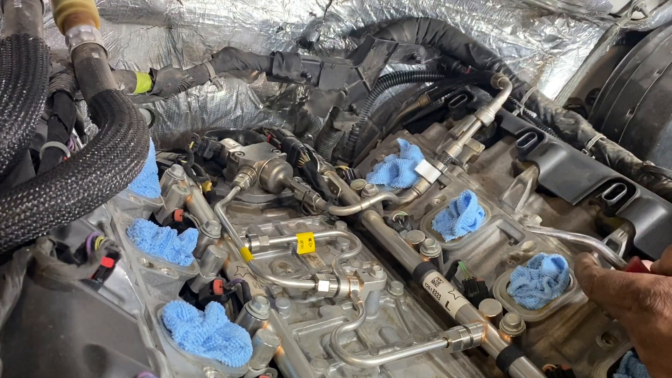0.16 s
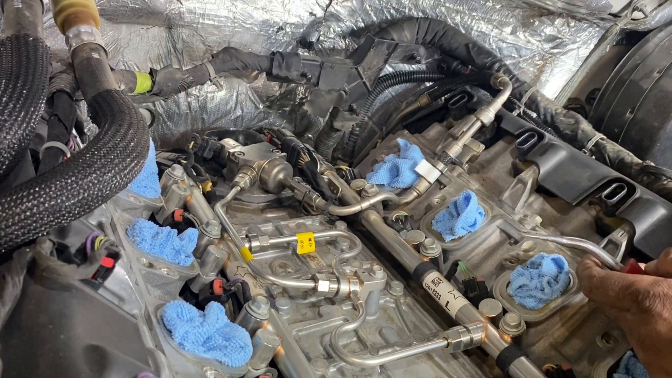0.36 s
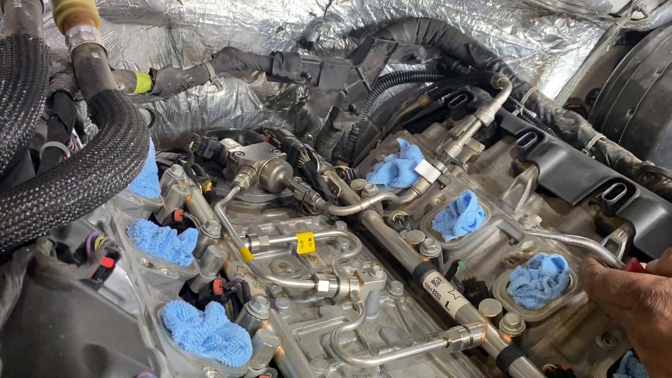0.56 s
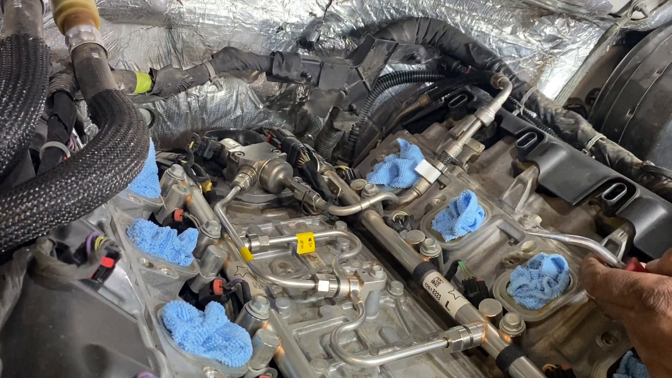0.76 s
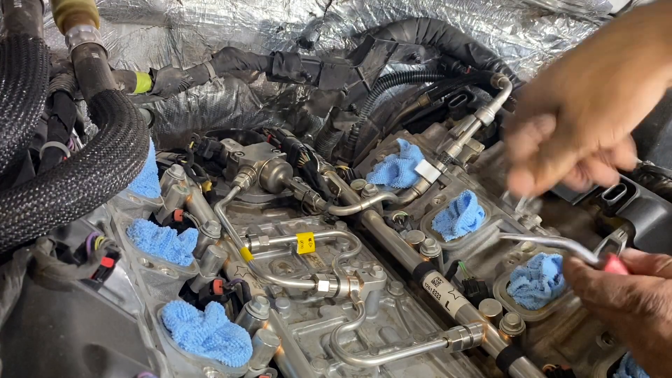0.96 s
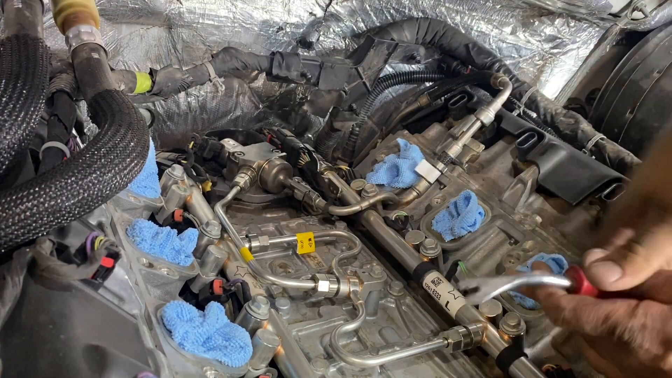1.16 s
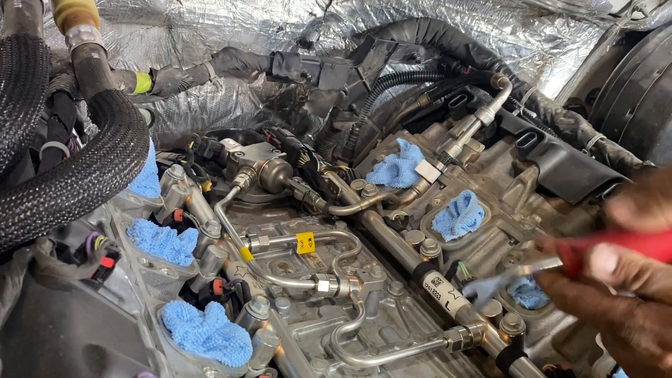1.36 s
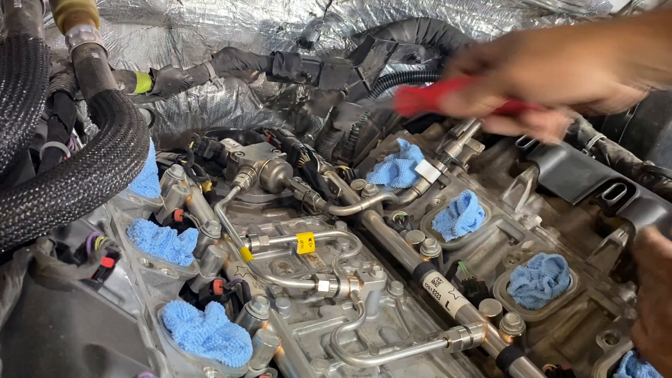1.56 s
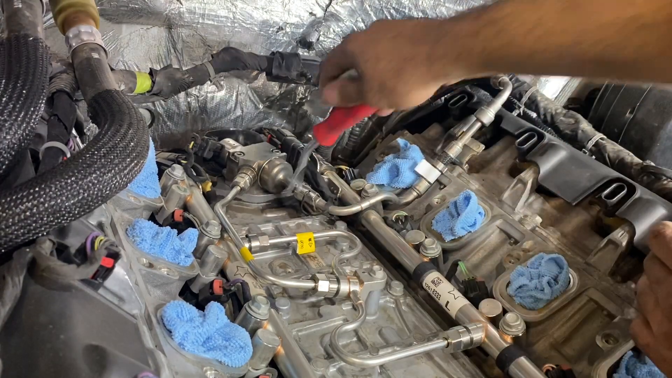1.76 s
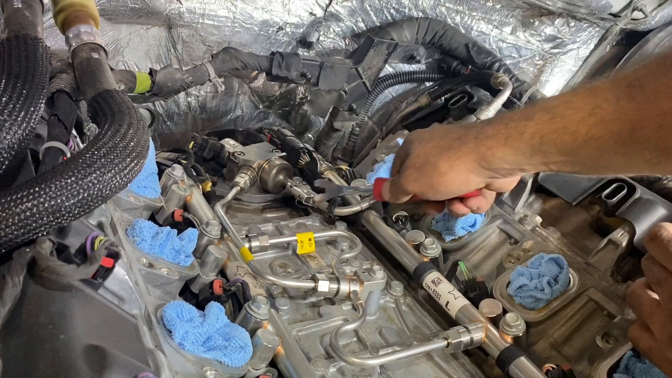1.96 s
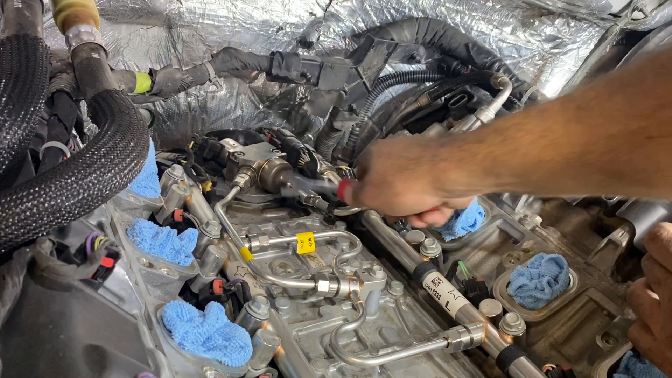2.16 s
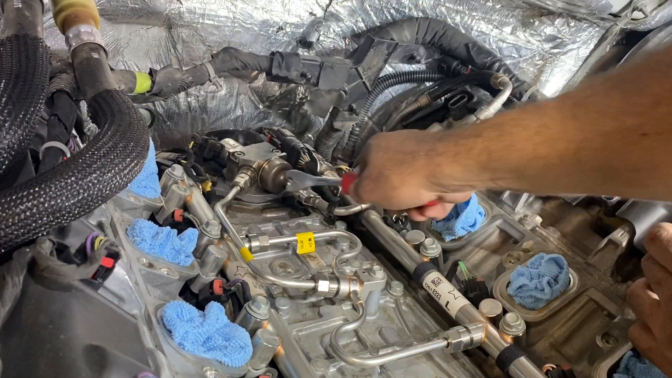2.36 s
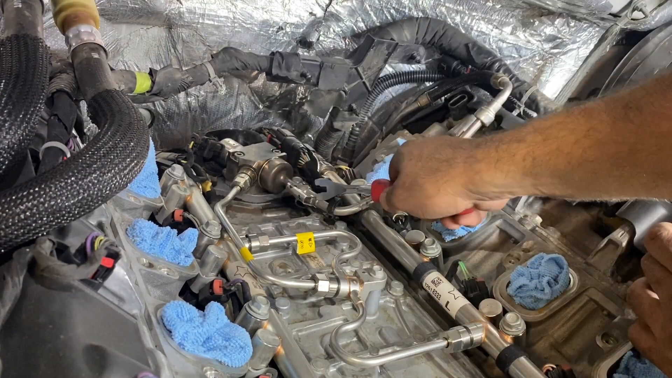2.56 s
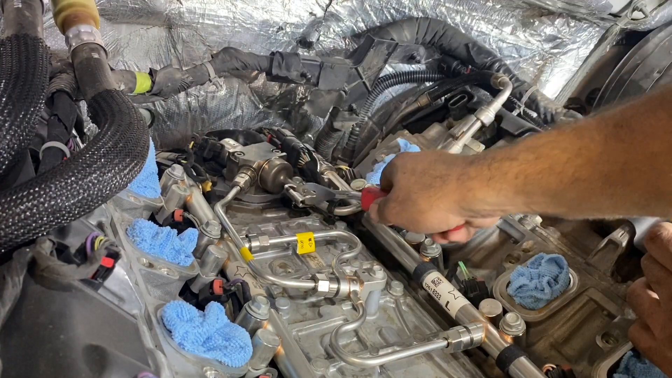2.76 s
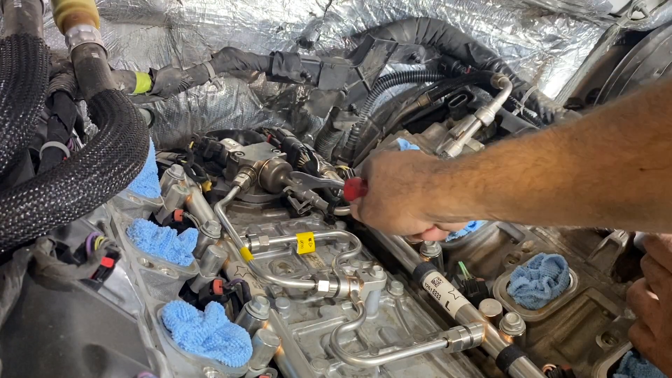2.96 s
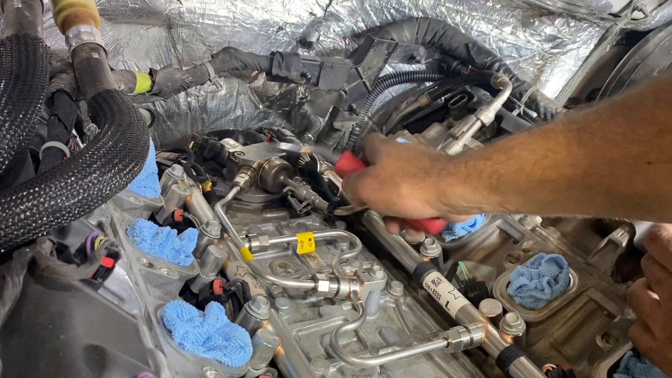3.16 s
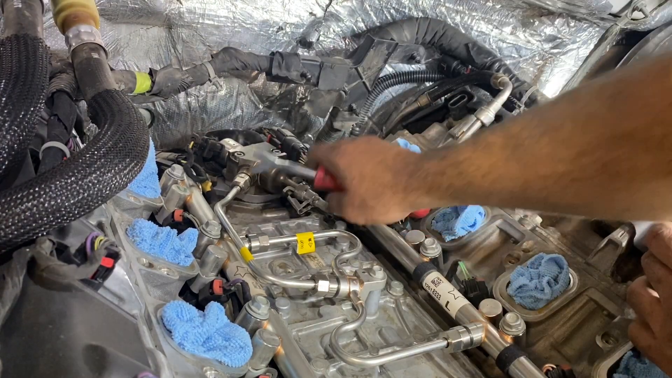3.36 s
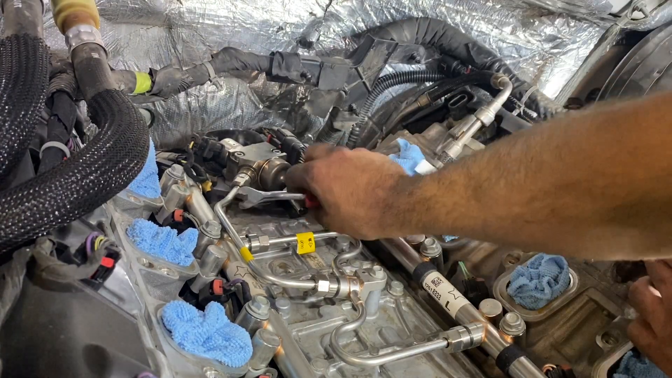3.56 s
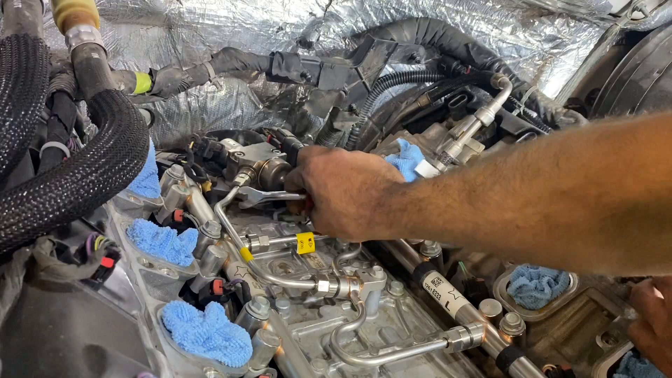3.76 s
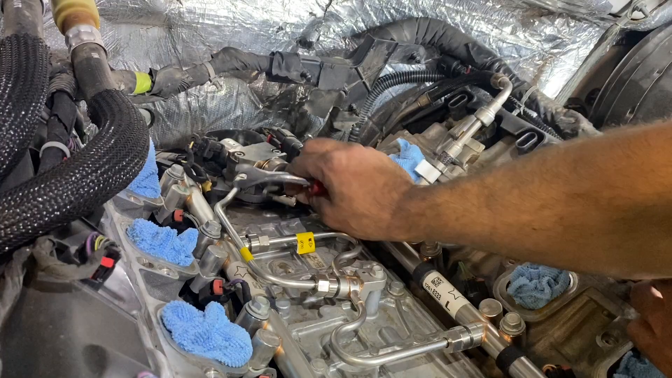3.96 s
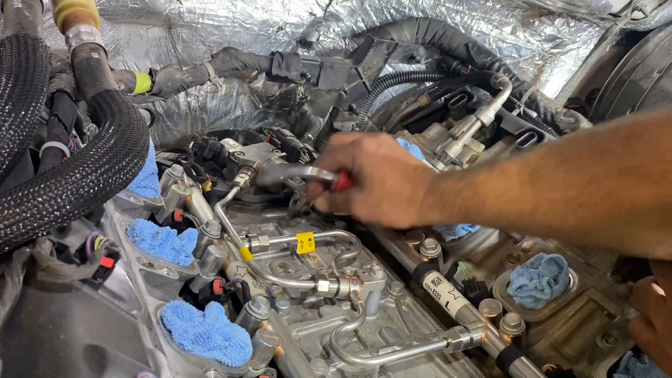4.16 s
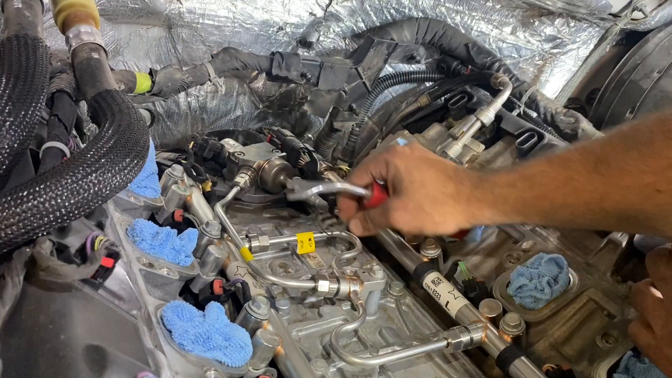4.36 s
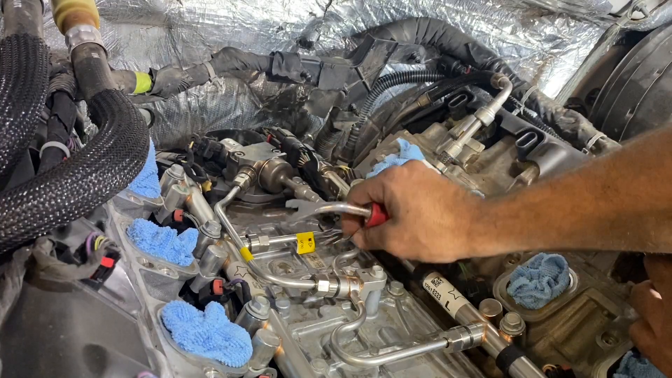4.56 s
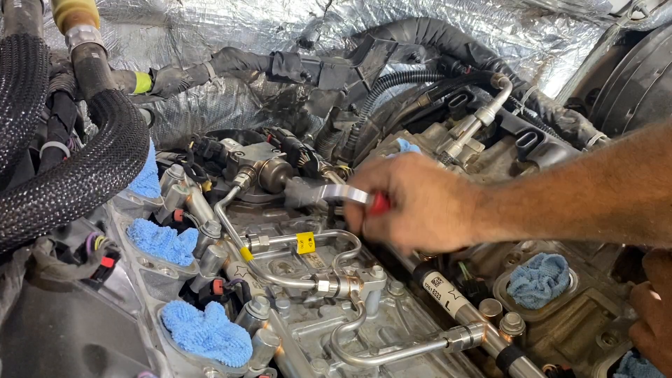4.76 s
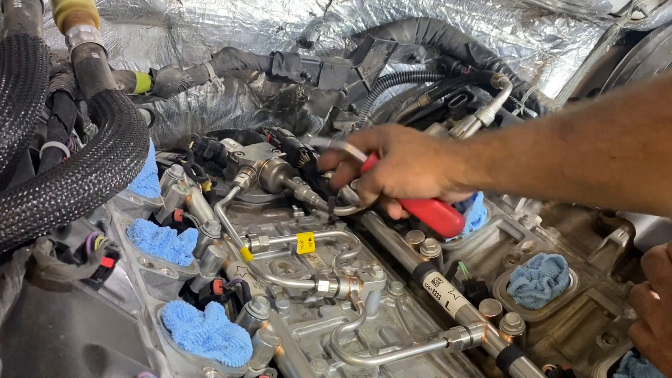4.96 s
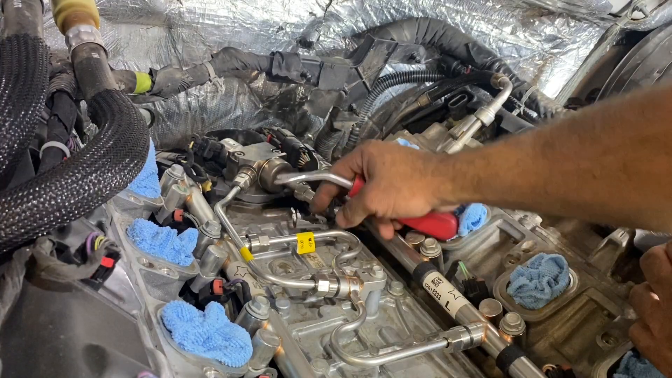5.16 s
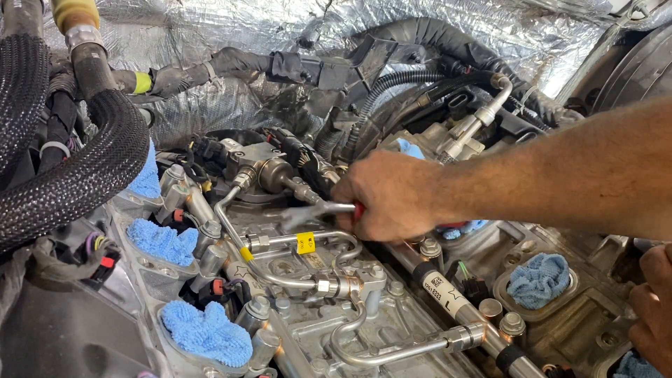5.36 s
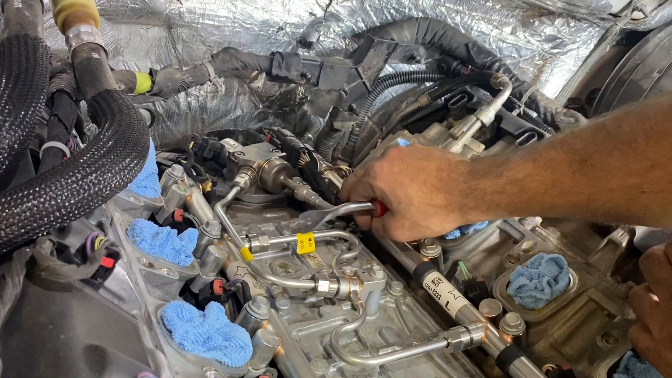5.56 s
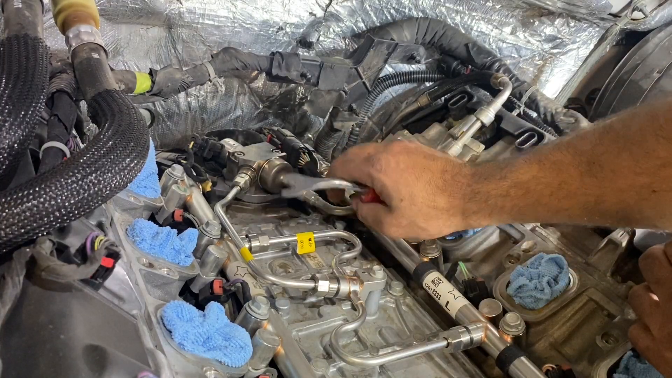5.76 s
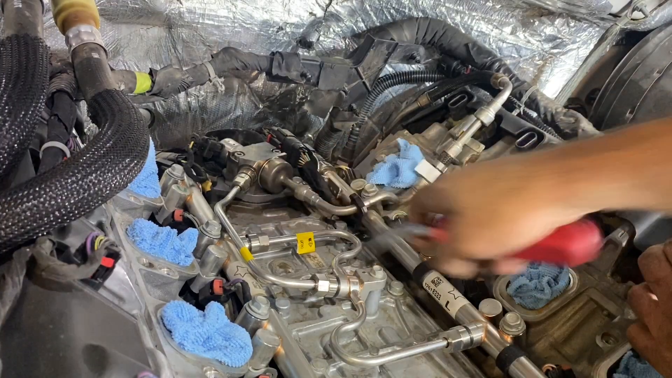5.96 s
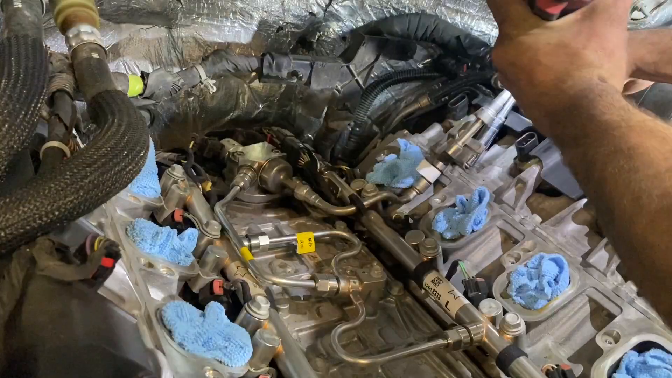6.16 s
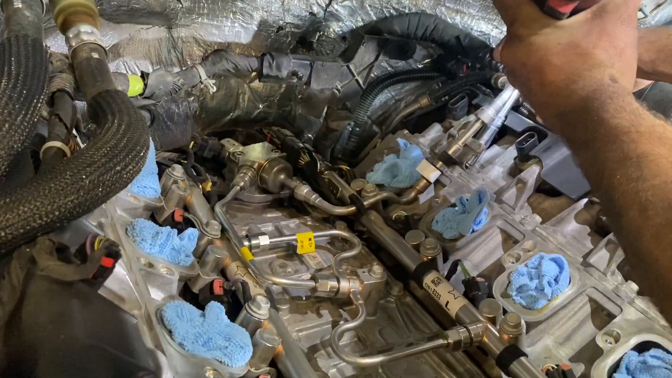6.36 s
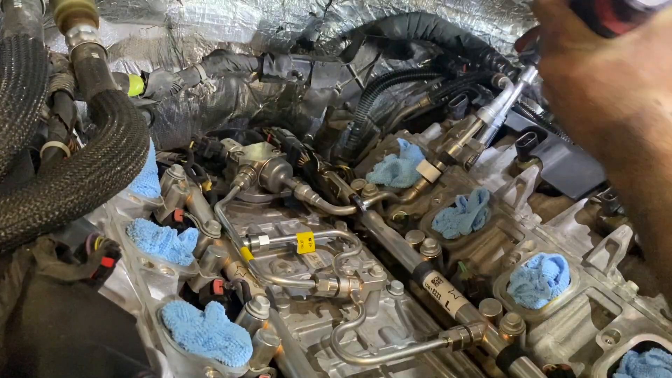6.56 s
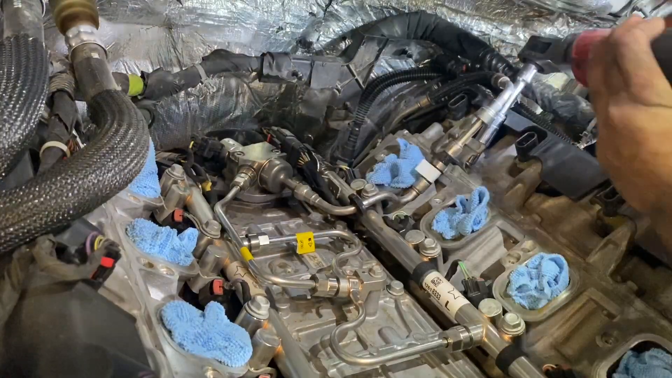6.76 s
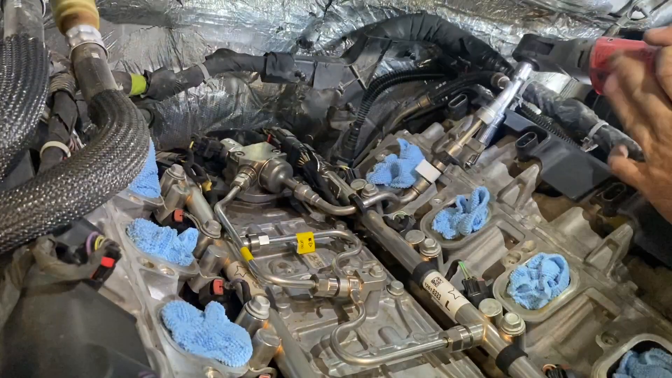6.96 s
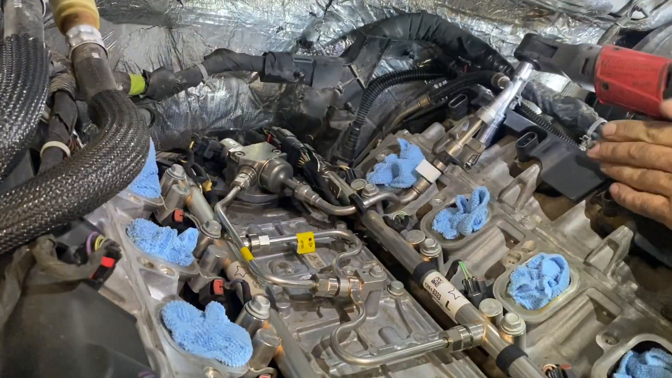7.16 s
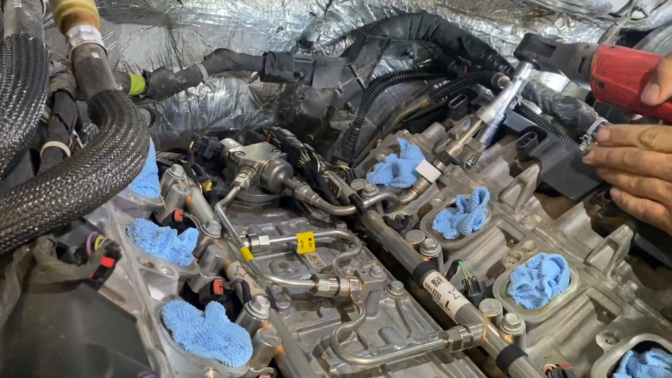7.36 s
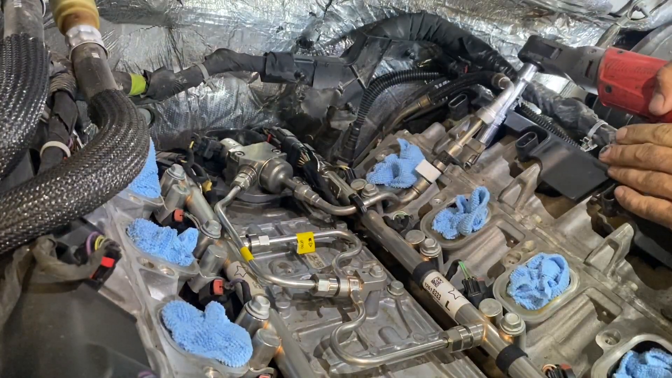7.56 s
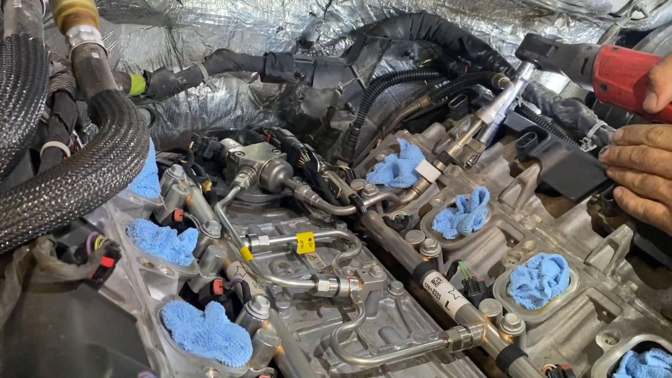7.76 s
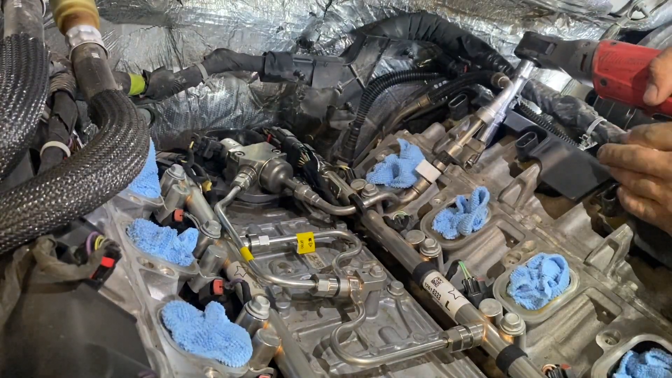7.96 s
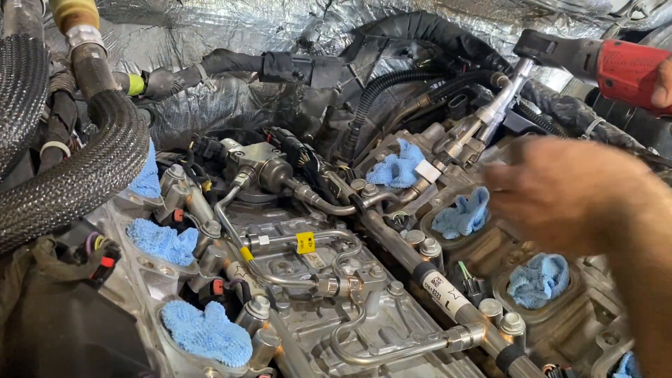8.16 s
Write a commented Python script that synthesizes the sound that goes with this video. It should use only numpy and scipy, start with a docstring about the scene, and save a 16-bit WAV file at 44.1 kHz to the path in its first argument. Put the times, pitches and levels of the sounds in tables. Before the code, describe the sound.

Close engine-bay work: dull knocks, small metallic clicks and ringing steel over low rumble, followed by two harsh, rattling electric ratchet runs.

```python
"""Engine bay in a workshop, heard close up over a low rumble, wavering hum and faint air noise.
A steel pry tool knocks, clicks and scrapes among hoses and clips: shaped noise bursts and random grains.
Blows on metal make its shank ring: pairs of beating, decaying sines.
Then a cordless ratchet spins a bolt out in two bursts: timed pawl blows, a shaking socket, motor sines."""
import sys
import numpy as np
from scipy import signal
from scipy.fft import rfft, irfft, next_fast_len
from scipy.io import wavfile
from scipy.ndimage import uniform_filter1d, map_coordinates

SR = 44100
rng = np.random.default_rng(int(sys.argv[2]) if len(sys.argv) > 2 else 0)


def pcm_store(signal):
    """Save signal as 16-bit PCM."""
    levels = np.round(np.clip(np.atleast_2d(signal), -1, 1) * 32767)
    wavfile.write(sys.argv[1], SR, levels.astype(np.int16).T)


N = 362502
TIME = np.arange(N) / SR


def gain_of(db):
    """Decibels to an amplitude factor."""
    return 10 ** (np.asarray(db) / 20)


def evened(x):
    """Scales to an rms of 1."""
    return x / np.sqrt(np.mean(x ** 2) + 1e-20)


def read(points, hz):
    """Interpolates a curve on a log-frequency axis."""
    point_hz, value = np.transpose(points)
    return np.interp(np.log(hz + 1), np.log(point_hz + 1), value)


def level(rows, column):
    """A dB column of a time curve as a gain at every sample, silent outside it."""
    rows = np.array(rows)
    return gain_of(np.interp(TIME, rows[:, 0], rows[:, column], left=-200, right=-200))


def add(mix, start_s, sound):
    """Mixes a sound in at start_s."""
    part = mix[:, max(round(start_s * SR), 0):][:, :sound.shape[-1]]
    part += sound[..., :part.shape[-1]]


def panned(x, db):
    """Makes the left side db louder than the right."""
    return x * gain_of([[db / 2], [-db / 2]])


def narrowed(pair, apart):
    """Turns two unrelated channels into a centred sound with some width."""
    return (pair[0] + apart * np.array([pair[1], -pair[1]])) / np.hypot(1, apart)


def colour(x, *spectra, size=4096):
    """A minimum-phase filter with the dB sum of the given spectra."""
    hz = abs(np.fft.fftfreq(size, 1 / SR))
    log_gain = np.log(gain_of(sum(read(points, hz) for points in spectra)))
    taps = np.fft.ifft(np.exp(np.conj(signal.hilbert(log_gain)))).real
    return signal.oaconvolve(np.atleast_2d(x), taps[None], axes=1)[:, :x.shape[-1]]


def resonances(modes, between_db):
    """The spectrum of a part with a few resonances and some response between them."""
    hz = np.arange(0, SR / 2, 10)
    power = sum(gain_of(db) ** 2 / (1 + (2 * (hz - centre) / width) ** 2) for centre, width, db in modes)
    return np.transpose([hz, 10 * np.log10(power + gain_of(between_db) ** 2)])


def wander(hz):
    """Slow chance of rms 1, mostly below the given rate."""
    slowness = 1 + (np.fft.rfftfreq(N, 1 / SR) / hz) ** 4
    return evened(irfft(rfft(rng.standard_normal(N)) / slowness, N))


def shifting(x, patchy_db=2.5):
    """Grip and load keep changing, so bands swell and fade on their own."""
    z = signal.stft(x, nperseg=512)[2]
    patches = rng.standard_normal(z.shape[1:])
    patches = uniform_filter1d(patches, size=5, axis=0)
    patches = evened(uniform_filter1d(patches, size=12, axis=1))
    return signal.istft(z * gain_of(patchy_db * patches), nperseg=512)[1][:, :N]


def burst(t60_s, size=8192):
    """A dense cluster of dying modes as decaying noise, different at each ear."""
    decay = gain_of(-60 * np.arange(size) / SR / max(t60_s, .002))
    return rng.standard_normal((2, size)) * decay


# time constant of the soft onset
ONSET_S = 0.00047


def hit(spectra, bass_db, treble_db, t60_s, crack_db, chatter_db):
    """A short crack, then the part chatters against its neighbours as it comes to rest."""
    tone = [(700, bass_db), (2000, 0.0021), (5000, 0.013), (8500, treble_db)]
    ring = burst(t60_s)
    chatter = evened(uniform_filter1d(rng.standard_normal(ring.shape[1]), size=110))
    ring = ring * gain_of(chatter_db * np.clip(chatter, -2, 2))
    ring = ring + gain_of(crack_db) * burst(0.0099)
    ring = ring * (1 - np.exp(-TIME[:ring.shape[1]] / ONSET_S))
    return colour(narrowed(ring, 0.67), tone, *spectra) / np.hypot(1, gain_of(crack_db))


# rumble spectrum shape: [freq_hz, relative_db]
RUMBLE_SPECTRUM = [(15, -43.5), (25, -39.5), (58, 0), (87, -3), (108, -1.5), (214, -21.5), (234, -15.5),
                   (265, -24), (356, -23.5), (409, -26.5), (539, -29.5), (574, -38.5), (1000, -57),
                   (1300, -91.5), (2200, -120)]
# air noise spectrum shape: [freq_hz, relative_db]
AIR_SPECTRUM = [(100, -25), (500, 3.5), (1000, -4), (2400, -14.5), (4000, -28.5), (8000, -19), (16000, -53)]


def workshop(hum_hz=94, rumble_db=-49, hum_db=-55, air_db=-68):
    """Distant machines: filtered-noise rumble, a hum wavering in level and phase, and faint air noise."""
    noise = narrowed(rng.standard_normal((2, N)), 0.62)
    rumble = evened(colour(noise, RUMBLE_SPECTRUM, [(1000, 2.5), (2000, -32.0)], size=16384))
    hum_gain = gain_of(hum_db + 1.1 * wander(4.5))
    hum = hum_gain * np.sin(2 * np.pi * hum_hz * TIME + 0.48 * wander(6.8))
    air = evened(colour(narrowed(rng.standard_normal((2, N)), 1.0), AIR_SPECTRUM))
    swell = level([(0, 2.5), (3, 2.5), (5.9, 1), (6.9, -3.5), (8.3, -4)], column=1)
    return swell * (gain_of(rumble_db) * rumble + hum) + gain_of(air_db) * air


# strokes of tool and hand along hoses: [start_s, length_s, level_db]
STROKES = [(0.197, 0.17, -63), (0.718, 0.025, -65.5), (0.957, 0.51, -64.5), (1.596, 0.17, -68),
           (1.811, 0.088, -50.5), (2.624, 0.15, -55.5), (2.839, 0.12, -52.5), (3.166, .05, -67),
           (3.311, 0.36, -65.5), (3.764, 0.34, -62.5), (4.64, 0.031, -60), (4.95, 0.69, -71),
           (5.368, 0.067, -56), (5.462, 0.078, -53), (5.62, 0.37, -69.5), (6.75, 0.6, -67.5)]
STROKE_RISE_S, STROKE_T60_S = 0.02, 0.13


def stroking():
    """How hard the tool rubs, as a gain: each stroke builds, holds and dies away."""
    force = np.zeros(N)
    for start_s, length_s, level_db in STROKES:
        rise = np.clip((TIME - start_s) / STROKE_RISE_S, 0, 1)
        after_s = np.maximum(TIME - start_s - length_s, 0)
        force = force + rise * gain_of(level_db - 60 * after_s / STROKE_T60_S)
    return force


# scrape spectrum shape: [freq_hz, relative_db]
RUB_SPECTRUM = [(200, 3), (700, 6), (1500, -2.5), (3000, -2), (5000, -3), (7500, -1), (11000, -5.5),
                (13000, -12.5), (16000, -28.5)]
# extra dulling of the light brushing: [freq_hz, relative_db]
LIGHT_TOUCH = [(2000, -2.5), (4000, -6), (8000, -13.5)]


def rubbing(grains_per_s=900, spread_db=5.5, hiss_db=2, snags_per_s=14, snag_db=9, handling_db=-73):
    """Tiny uneven slips over a soft hiss; now and then the tip snags with a faint click."""
    slips = gain_of(spread_db * np.minimum(rng.exponential(1, N), 4))
    slips = slips * (rng.random(N) < grains_per_s / SR)
    grain_decay = np.exp(-TIME[None, :500] / 0.0012)
    grains = signal.oaconvolve(slips[None] ** 2, grain_decay, axes=1)[0, :N]
    snags = rng.random(N) * (rng.random(N) < snags_per_s / SR)
    snags = signal.oaconvolve(snags, np.exp(-TIME[:2000] / .005))[:N]
    force = evened(np.sqrt(abs(grains))) + gain_of(hiss_db) + 2 * gain_of(snag_db) * snags
    noise = narrowed(force * rng.standard_normal((2, N)), 0.66)
    scrape = colour(noise, RUB_SPECTRUM, resonances(CLIP_MODES, between_db=5.5))
    scrape = evened(shifting(scrape, patchy_db=4.0))
    # steady, duller brushing of the hand under the strokes
    handling = gain_of(handling_db) * evened(colour(scrape, LIGHT_TOUCH))
    return stroking() * scrape + handling


# dull parts, spectrum shape (also used by clacks): [freq_hz, relative_db]
DULL_SPECTRUM = [(40, 16.5), (150, 8), (350, 11.5), (600, 12.5), (1200, 7), (2300, 5), (3200, -2.5),
                 (6000, -7.5), (10000, -10), (16000, -38)]
# knock resonances: [freq_hz, width_hz, relative_db]
KNOCK_MODES = [(131, 18, -1.5), (813, 17, -9.5), (1113, 47, 2.5), (1416, 88, 0.5), (1630, 43, -6.5),
               (2010, 240, -5), (2700, 93, -2)]
# knocks, before trims; the last two fall together with ringing steel blows: [start_s, level_db, bass_db,
# treble_db]
KNOCKS = [(0.1591, -10.5, -13, -9), (0.168, -11, -2.5, -13.5), (0.236, -27.5, 4.5, -13.5),
          (0.265, -33.5, 8, -14), (0.309, -30, 4, -29), (0.3317, -14, -0.5, -20),
          (0.352, -13.5, -2.5, -14.5), (0.3681, -19.5, 1, -18), (0.383, -14.5, 0.5, -18),
          (1.028, -36, 6, -25), (4.8959, -18.5, -17.5, -28), (5.537, -34.5, -14, -18)]


def knocks(trim_db=7, bass_trim_db=-1, treble_trim_db=9, t60_s=0.073):
    """Dull resonant knocks as noise bursts; the last two fall together with ringing steel blows."""
    out = np.zeros((2, N))
    spectra = [DULL_SPECTRUM, resonances(KNOCK_MODES, between_db=-9.5)]
    for start_s, level_db, bass_db, treble_db in KNOCKS:
        knock = hit(spectra, bass_db + bass_trim_db, treble_db + treble_trim_db, t60_s,
                    crack_db=4, chatter_db=1.0)
        add(out, start_s, gain_of(level_db + trim_db) * knock)
    # a low thump under every knock
    thump = colour(out, [(80, -15.5), (135, 12.5), (190, 8.0), (350, -21), (1000, -62.5)])
    return panned(out + gain_of(-13.0) * thump, 1.5)


# connector resonances: [freq_hz, width_hz, relative_db]
CONNECTOR_MODES = [(660, 47, -3.5), (1300, 49, 1), (1740, 67, -5.5), (3080, 150, 0), (4910, 37, 2),
                   (6570, 110, -28.5), (7900, 390, -14)]
# clacks, before trims: [start_s, level_db, bass_db, treble_db]
CLACKS = [(3.4792, -19, -6, -6.5), (3.502, -14.5, -11, -12), (3.5141, -16.5, -23, -13),
          (3.5216, -26.5, -4.5, -16), (4.4946, -36, 6, -12.5)]


def clacks(trim_db=10, bass_trim_db=2, treble_trim_db=9, t60_s=0.05):
    """A hollow connector snaps against the tool: resonant bursts with strong chatter."""
    out = np.zeros((2, N))
    shell = [DULL_SPECTRUM, resonances(CONNECTOR_MODES, between_db=-15)]
    for start_s, level_db, bass_db, treble_db in CLACKS:
        clack = hit(shell, bass_db + bass_trim_db, treble_db + treble_trim_db, t60_s,
                    crack_db=1, chatter_db=7)
        add(out, start_s, gain_of(level_db + trim_db) * clack)
    return panned(out, 1.6)


# clip and pipe resonances (also used by rubbing): [freq_hz, width_hz, relative_db]
CLIP_MODES = [(1204, 150, -16), (2560, 120, -20.5), (2930, 33, -5), (3170, 170, -2), (4050, 270, -9),
              (4110, 200, -0.5), (5290, 210, -4.5), (5800, 100, -2.5), (7700, 220, -10.5), (9740, 750, 1),
              (11050, 200, -1.5)]


def ping(treble_db, t60_s, spot_db=4, detune=0.038):
    """The few clear modes of one small steel part; every part is tuned a little differently."""
    t = TIME[:SR // 4]
    out = np.zeros((2, len(t)))
    for mode_hz, _, level_db in CLIP_MODES:
        size, tuning, left, right = rng.standard_normal(4)
        db = level_db + spot_db * size + read([(5000, 0.0016), (8500, treble_db)], mode_hz)
        phase = 2 * np.pi * mode_hz * (1 + detune * tuning) * t + .5 * np.array([[left], [right]])
        out += gain_of(db - 60 * t / max(t60_s, .01)) * np.sin(phase)
    return out


# sharp parts, spectrum shape: [freq_hz, relative_db]
BRIGHT_SPECTRUM = [(100, -34), (500, -8.5), (1300, -14.5), (2000, -6), (3000, -9.5), (4300, -3), (5500, -3),
                   (7500, 3), (10000, 1), (12000, -5), (16000, -14)]
# clicks, before trims: [start_s, level_db, bass_db, treble_db, t60_s, pitch_hz of the struck part]
CLICKS = [(0.9942, -41, 11, -36, 0.057, 4220), (1.051, -40, 11, -16, 0.027, 4150),
          (1.826, -22.5, -1, -9, 0.096, 2950), (1.9345, -32.5, -11, -0.5, .025, 6850),
          (1.9806, -23.5, -35, -7.5, 0.031, 4050), (2.073, -27.5, -32, -19.5, .045, 2900),
          (2.1522, -31.5, -31, -14, 0.098, 4150), (2.38, -38, -26, -13.5, 0.16, 4030),
          (2.468, -30, -25, -9.5, 0.086, 5670), (2.4992, -31.5, -25, -12, 0.096, 2800),
          (2.5542, -35, -25, -14, 0.032, 4230), (2.7411, -37.5, -10, -15, 0.12, 3190),
          (2.8609, -31, -2, -6, .11, 3240), (2.9122, -29, -16, -18, 0.044, 3240),
          (2.933, -26.5, -2, -13, 0.1, 4200), (3.743, -36.5, 6, -1, .055, 6800),
          (3.7736, -22.5, -5, -3.5, 0.037, 7700), (3.908, -44.5, -17, -9, 0.094, 3040),
          (3.9414, -39.5, -3, -3.5, 0.027, 8600), (4.81, -46, -20, -4.5, 0.088, 7400),
          (5.349, -39, -18, -3, .046, 7500), (5.3577, -35.5, 0.5, 2, .09, 7500)]
# second landing of the tip: delay as a share of the t60, level change
REBOUND_SHARE, REBOUND_DB = .14, -9


def clip_spectra():
    return [BRIGHT_SPECTRUM, resonances(CLIP_MODES, between_db=-0.5)]


def clicks(trim_db=5, bass_trim_db=9, treble_trim_db=4, ping_db=-12, ping_length=0.7,
           part_db=6, part_width=0.17):
    """The tool tip slips over clips and pipes: a crack, a chatter, a rebound and a short ping."""
    out, clips = np.zeros((2, N)), clip_spectra()
    for start_s, level_db, bass_db, treble_db, t60_s, pitch_hz in CLICKS:
        part = resonances([(pitch_hz, part_width * pitch_hz, part_db)], between_db=0.5)
        for late_s, weaker_db in [(0, 0), (REBOUND_SHARE * t60_s, REBOUND_DB)]:
            click = hit(clips + [part], bass_db + bass_trim_db, treble_db + treble_trim_db, t60_s,
                        crack_db=4, chatter_db=3)
            add(out, start_s + late_s, gain_of(level_db + weaker_db + trim_db) * click)
        add(out, start_s, gain_of(level_db + ping_db) * ping(treble_db, t60_s * ping_length))
    return panned(out, 2.2)


# steel shank modes: [freq_hz, relative_db, t60_s]
STEEL_MODES = [(2357, -20, 1.8), (4050, 0, 0.37), (4664, -6.5, 0.42), (5730, -15, 0.26), (6293, -8, 0.26),
               (7420, 0, 0.29), (9580, 8.5, 0.26), (10970, 0, 0.25), (11760, 6.5, 0.15), (13200, -8, 0.24),
               (14650, -7, 0.17)]
# ringing blows: [start_s, contact_db before trim, low_db (near 4 kHz), middle_db (near 4.7 kHz),
#                 upper_db (near 7 kHz), high_db (above 9 kHz), free_s until the hand damps it]
CLINKS = [(4.837, -27, -37.5, -32, -59, -32.5, 0.045), (4.897, -26, -33.5, -31, -22.5, -27.5, 0.37),
          (5.376, -27.5, -53, -69, -49, -34, 0.0048), (5.408, -27, -60, -56, -61, -31.5, 0.012),
          (5.539, -39.5, -51, -32, -44.5, -47, 0.3), (5.788, -66, -58, -61, -56.5, -66, 0.026)]


def clink_contacts(trim_db=5):
    """The contact click of each ringing blow: a bright noise burst."""
    out, clips = np.zeros((2, N)), clip_spectra()
    for start_s, contact_db, *_ in CLINKS:
        click = hit(clips, bass_db=2.5, treble_db=-12, t60_s=0.1, crack_db=3.5, chatter_db=0.0)
        add(out, start_s, gain_of(contact_db + trim_db) * click)
    return panned(out, 2.2)


def clinks(damp_s=0.016, beat_hz=5, twin=0.86, jangle_db=1, jangle_s=0.0058):
    """The shank rings freely until the hand closes on it; the place of the blow picks the modes."""
    out, t = np.zeros((2, N)), TIME[:SR]
    for start_s, _, low_db, middle_db, upper_db, high_db, free_s in CLINKS:
        place = [(4100, low_db), (4650, middle_db), (5800, upper_db), (7500, upper_db), (9600, high_db)]
        ring = 0
        for mode_hz, level_db, t60_s in STEEL_MODES:
            start, split, left, right = rng.standard_normal(4)
            # a nearly round shank has each mode twice: the pair beats, so the ring holds after the blow
            beat = 1 - twin * np.exp(2j * np.pi * beat_hz * (1 + 0.34 * split) * t)
            # while the parts still touch they jangle much louder
            jangle = gain_of(jangle_db) * np.exp(-t / jangle_s)
            phase = 2 * np.pi * (mode_hz * t + start) + .5 * np.array([[left], [right]])
            decay = gain_of(level_db + read(place, mode_hz) - 60 * t / t60_s)
            ring = ring + decay * ((beat + jangle) * np.exp(1j * phase)).real
        add(out, start_s, ring * np.exp(-np.maximum(t - free_s, 0) / damp_s))
    return panned(out, -1)


# ticks: [start_s, level_db]
TICKS = [(6.898, -48), (6.985, -36.5), (7.063, -40), (7.118, -37.5), (7.17, -40), (7.204, -39),
         (7.239, -27), (7.412, -31)]


def socket_ticks():
    """The socket settles on the bolt: light, short noise bursts."""
    out = np.zeros((2, N))
    spectrum = [(500, -15), (1500, -6.5), (3000, -7.5), (7000, -6.5), (14000, -24.5)]
    for start_s, level_db in TICKS:
        add(out, start_s, gain_of(level_db) * colour(narrowed(burst(0.041), 0.65), spectrum))
    return panned(out, 2.2)


# trigger pulls: [pressed_s, released_s, spin_up_s (time constant), tightest_s (thread tightest),
#                 clatter_db, shake_db, whine_db (at the tightest thread, before trims)]
PULLS = [(6.065, 6.745, .014, 6.18, -24, -28, -36.5), (7.446, 8.3, .035, 7.746, -23, -28, -29)]
# full motor speed, one per pull: [turns_per_s]
MOTOR_HZ = [462.3, 460.5]
# after release: time constant of the coasting motor, fade time of the sound
COAST_S, STOP_S = .3, .025
# (power of the speed, dB per s lost either side of the tightest thread)
CLATTER_LAW, SHAKE_LAW, WHINE_LAW = (1.9, 4), (4.2, 13.5), (20, 27)


def drive():
    """Each pull spins the motor up, then it coasts; speed and thread friction set the layer gains."""
    speed_hz, gains = np.full(N, MOTOR_HZ[0]), np.zeros((3, N))
    for (pressed_s, released_s, spin_up_s, tightest_s, *levels_db), full_hz in zip(PULLS, MOTOR_HZ):
        share = 1 - np.exp(-np.maximum(TIME - pressed_s, 0) / spin_up_s)
        idle_s = np.maximum(TIME - released_s, 0)
        running = (TIME > pressed_s) & (idle_s < COAST_S / 2)
        speed_hz = np.where(running, full_hz * share * np.exp(-idle_s / COAST_S), speed_hz)
        stop = np.exp(-(idle_s / STOP_S) ** 2)
        laws = [CLATTER_LAW, SHAKE_LAW, WHINE_LAW]
        for gain, level_db, (power, easing) in zip(gains, levels_db, laws):
            gain += share ** power * gain_of(level_db - easing * abs(TIME - tightest_s)) * stop
    return speed_hz, gains


def passes(turns):
    """A unit click each time the count of turns passes a whole number, negative if it runs back."""
    return np.diff(np.floor(turns), prepend=np.floor(turns[0]))


# blows within one swing: [share_of_swing, relative_db]
PAWL_BLOWS = [(0, -10), (.25, -11.5), (.51, -14.5), (.76, -7)]
# ratchet head spectrum shape: [freq_hz, relative_db]
HEAD_SPECTRUM = [(300, -10.5), (700, 1.5), (1000, -0.5), (1600, -2.5), (2100, 0), (2800, 0), (3400, -1),
                 (4500, -1.5), (7000, -1), (8200, 2.5), (9200, 2.5), (10400, 4), (11600, -6),
                 (15600, -18.5)]
# casing resonances: [freq_hz, width_hz, relative_db]
CASING_MODES = [(921, 24, -0.5), (1460, 62, -2.5), (2790, 410, -4.5), (3690, 6.3, 0.5), (4630, 310, 0.5),
                (6224, 52, 2.5), (6770, 230, -8), (7160, 670, -3.5)]


def clatter(swings, loose_db=3.0, slop=.03, ring_t60_s=0.064, grind_db=-3, mesh_db=-7, count=6):
    """Yoke and pawl strike four times a swing, on changing teeth; gears grind between the blows."""
    blows = sum(gain_of(db) * passes(swings - share + slop * wander(90)) for share, db in PAWL_BLOWS)
    blows = blows * gain_of(loose_db * np.clip(rng.standard_normal(N), -2, 2))
    tooth = rng.integers(0, count, N)
    rings = 0
    for k in range(count):
        tooth_blows = (blows * (tooth == k))[None]
        rings = rings + signal.oaconvolve(tooth_blows, burst(ring_t60_s), axes=1)[:, :N]
    grind = rng.standard_normal((2, N)) * gain_of(2 * wander(400))
    # the same uneven teeth come round in every swing: a buzz on all multiples of the swing rate
    teeth = rng.standard_normal((2, 680))
    mesh = np.array([map_coordinates(row, [swings % 1 * len(row)], mode="grid-wrap") for row in teeth])
    metal = evened(rings) + gain_of(grind_db) * evened(grind) + gain_of(mesh_db) * evened(mesh)
    metal = shifting(narrowed(metal, 0.5))
    return evened(colour(metal, HEAD_SPECTRUM, resonances(CASING_MODES, between_db=-3.5)))


# housing and socket spectrum shape: [freq_hz, relative_db]
SHAKE_SPECTRUM = [(40, -47), (65, -42), (120, -10.5), (195, 7), (225, 8.5), (260, 2), (350, -15),
                  (410, -8.5), (460, 8), (590, 10.5), (660, -3), (950, -20), (1500, -22.5), (4000, -45)]


def shake(swings, loose_db=3.0, rattle_db=-1, rattles_per_s=170):
    """Each swing kicks the housing; the loose socket rattles on the bolt at random moments."""
    kicks = passes(swings + 0.012 * wander(30))
    kicks = kicks * gain_of(loose_db * np.clip(rng.standard_normal(N), -2, 2))
    decay = np.exp(-TIME[None, :900] / 0.0023)
    starts = (rng.random((1, N)) < rattles_per_s / SR) * 1.
    jolts = signal.oaconvolve(starts, decay, axes=1)[:, :N]
    rattles = narrowed(jolts * rng.standard_normal((2, N)), 0.73)
    return evened(colour(evened(kicks) + gain_of(rattle_db) * evened(rattles), SHAKE_SPECTRUM))


# motor turns per swing of the yoke
GEAR_RATIO = 57 / 8
# motor whine: [multiple_of_motor_speed, relative_db]
WHINE = [(1, -8.5), (2, -10.5), (4, -9.5), (8, 3.5), (16, -18)]


def ratchet(flutter=.0015, waver_db=1.0, head_trim_db=4.0):
    """The motor whines and, geared down, swings the yoke that drives the pawl."""
    speed_hz, (clatter_gain, shake_gain, whine_gain) = drive()
    turns = np.cumsum(speed_hz * (1 + flutter * wander(25))) / SR
    whine = sum(gain_of(db + waver_db * wander(35)) * np.sin(2 * np.pi * k * turns) for k, db in WHINE)
    swings = turns / GEAR_RATIO
    head = gain_of(head_trim_db) * clatter_gain * clatter(swings)
    body = shake_gain * shake(swings)
    return panned(head, 0.62) + panned(body, -0.35) + whine_gain * whine


# workshop reverberation: [freq_hz, t60_s]
SHOP_T60 = [(100, 1), (500, 0.31), (2000, 0.45), (6000, 0.36), (15000, 0.14)]


def room(x):
    """The diffuse tail of the workshop: noise, each band dying at its own speed."""
    noise = rng.standard_normal((2, SR)) * (TIME[:SR] > .008)
    hz, t, z = signal.stft(noise, SR, nperseg=256)
    tail = signal.istft(z * gain_of(-60 * t / read(SHOP_T60, hz)[:, None]), SR, nperseg=256)[1]
    return signal.fftconvolve(x.mean(0)[None], tail / np.linalg.norm(tail[0]), axes=1)[:, :N]


def scene():
    """All sources; knocks, sharp sounds and ratchet each send their share to the room."""
    background = workshop() + rubbing()
    dull = knocks()
    sharp = clacks() + clicks() + clink_contacts() + clinks() + socket_ticks()
    tool = ratchet()
    wet = room(gain_of(-17.0) * dull + gain_of(-19.5) * sharp + gain_of(-25.5) * tool)
    return background + dull + sharp + tool + wet


# left-right phase of the recorder's stereo widening: [freq_hz, left_lead_rad]
STEREO_PHASE = [(0, 0), (5800, 0), (6400, .6), (8000, -1.8), (9000, -3.14), (10000, -4.4), (11300, -6.28),
                (13200, -9.42), (14700, -12.57)]
# gain of the left-right difference: [freq_hz, side_db]
STEREO_WIDTH = [(60, -12.5), (130, -7), (250, -0.5), (800, 1.5), (5500, 2), (9000, -14), (13000, -4.5)]
EDGE_HZ = 16100


def record(dry):
    """The recorder narrows bass and treble and turns treble phase; low cut and band limit follow."""
    size = next_fast_len(N + SR // 4)
    hz = np.fft.rfftfreq(size, 1 / SR)
    left, right = rfft(dry, size)
    mid = (left + right) / 2
    side = (left - right) / 2 * gain_of(read(STEREO_WIDTH, hz))
    turn = np.exp(.5j * np.interp(hz, *np.transpose(STEREO_PHASE)))
    pair = irfft(np.array([(mid + side) * turn, (mid - side) / turn]), size)[:, :N]
    pair = signal.sosfilt(signal.butter(3, 45, "highpass", fs=SR, output="sos"), pair)
    band_limit = signal.firwin(511, EDGE_HZ, window=("kaiser", 9), fs=SR)
    return signal.oaconvolve(pair, band_limit[None], "same")


dry = scene()
out = record(dry)
pcm_store(out)
```